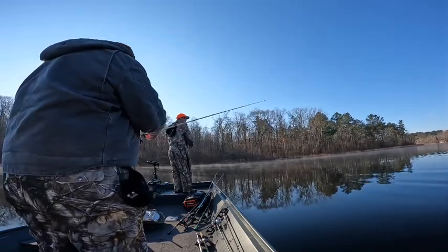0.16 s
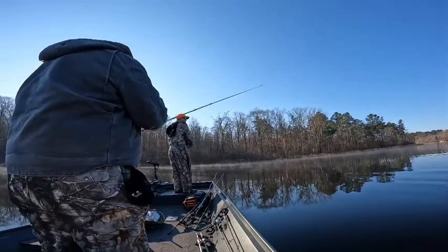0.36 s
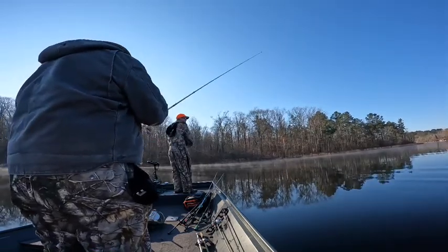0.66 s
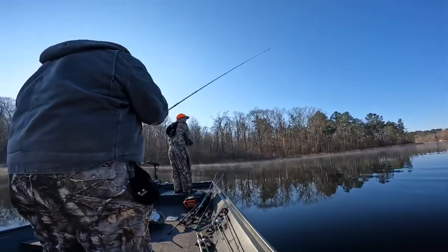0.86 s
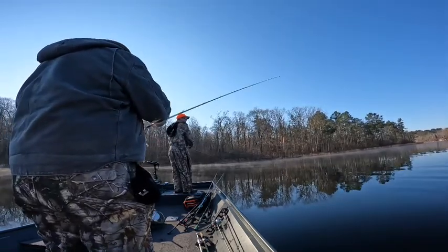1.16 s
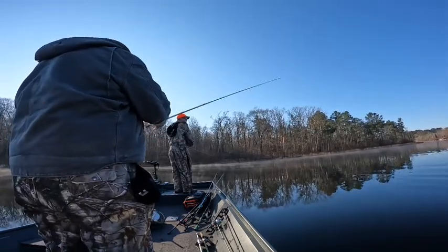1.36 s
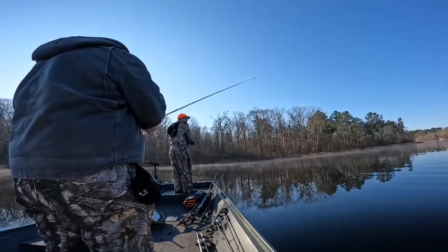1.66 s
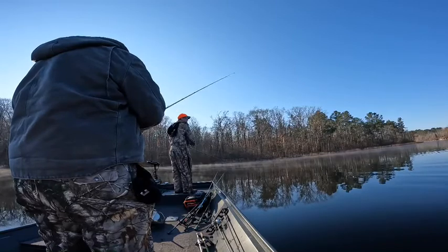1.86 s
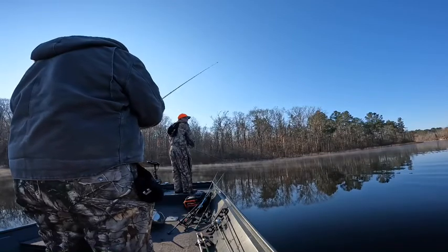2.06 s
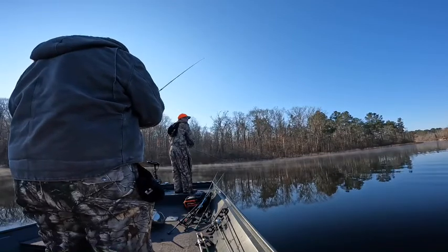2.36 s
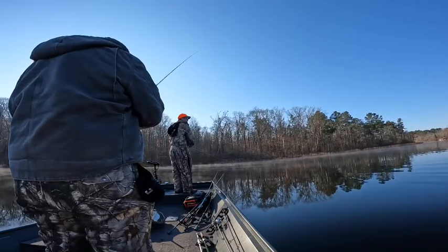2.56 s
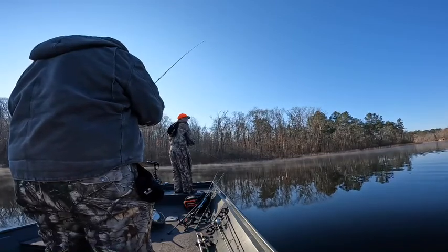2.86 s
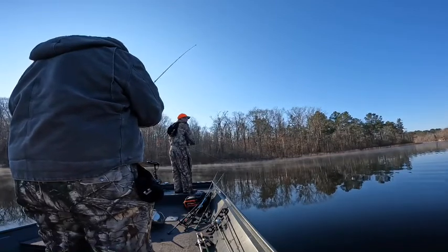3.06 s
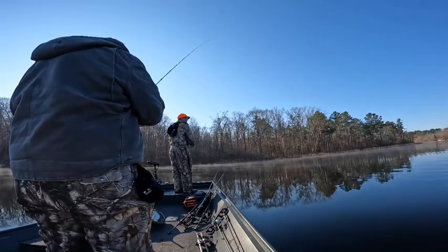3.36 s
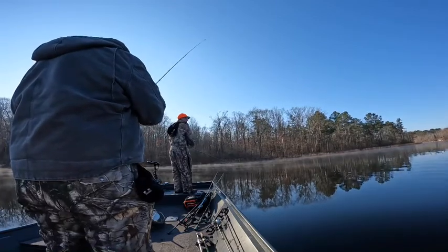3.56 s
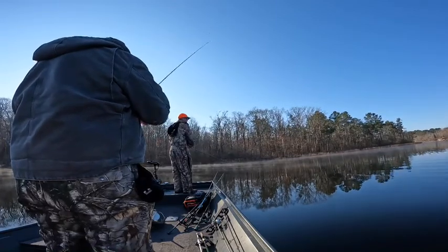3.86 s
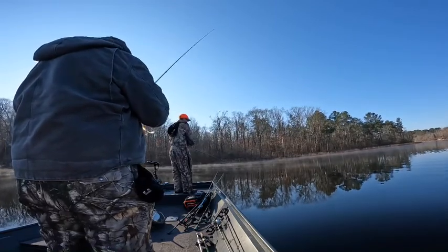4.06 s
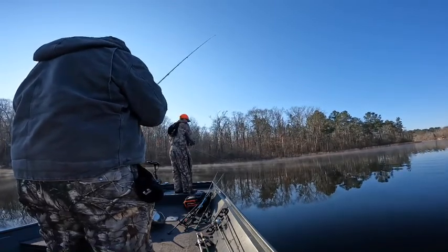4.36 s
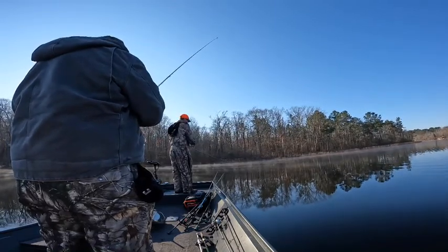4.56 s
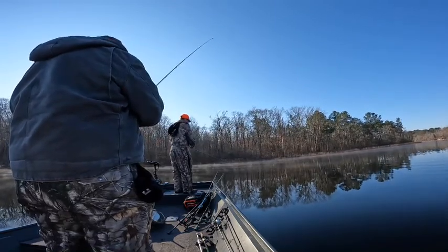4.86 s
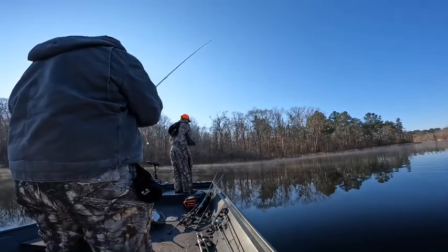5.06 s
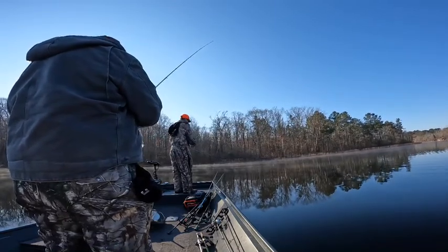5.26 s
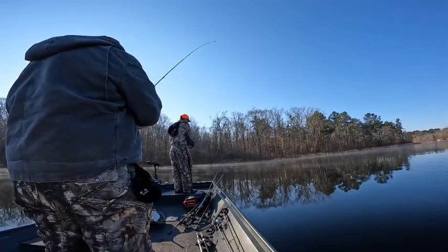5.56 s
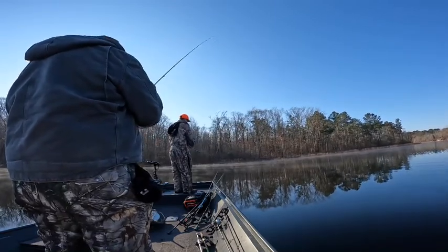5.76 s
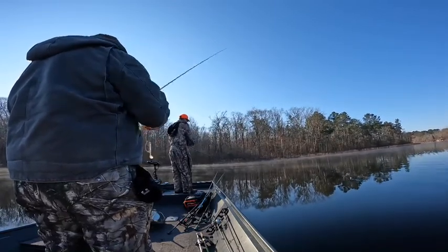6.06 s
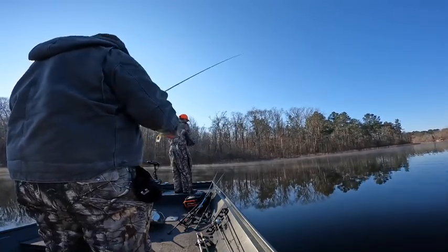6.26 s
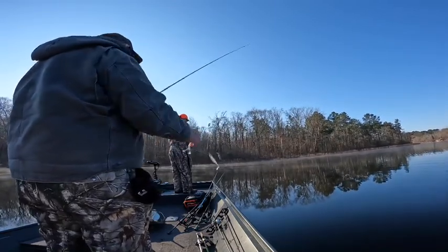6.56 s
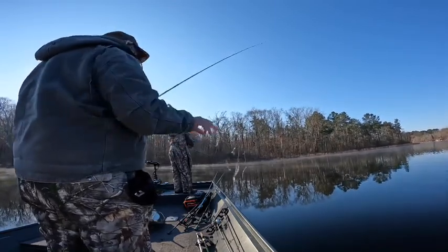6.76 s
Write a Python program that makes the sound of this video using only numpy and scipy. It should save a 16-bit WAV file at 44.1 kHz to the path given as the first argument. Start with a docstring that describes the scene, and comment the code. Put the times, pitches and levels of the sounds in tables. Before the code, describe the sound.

Close on a metal boat, gear knocks the hull at once, then strikes hardest around half a second with rattling rebounds. A sharp reel click follows, then sparse clicks, faint clinks and soft water plops. A stiff jacket rustles, and a lure jingles brightly near the end. A steady low motor rumble lies beneath quiet open river air.

```python
"""Gear knocks and rattles on the hull of an aluminium boat as an angler handles his tackle on a calm river.
Reel, rod and lure parts click, two spinner blades and a hook clink, beads tick and a stiff jacket rustles.
Behind them ripples plop on the hull, an electric motor rumbles and far birds call in quiet open air.
Struck parts are noise bursts with decaying modes; water, cloth, air and rumble are shaped noise, with bubbles
as rising sines; calls and squeaks are gliding tones."""
import sys
import numpy as np
from scipy import signal
from scipy.fft import rfft, irfft, next_fast_len
from scipy.io import wavfile
from scipy.ndimage import map_coordinates

SR = 44100
rng = np.random.default_rng(int(sys.argv[2]) if len(sys.argv) > 2 else 0)


def output_pcm(signal):
    """Save a mono or channel-first signal as 16-bit PCM at the path in sys.argv[1].

    Samples are clipped to [-1, 1] before scaling.
    """
    pcm = np.clip(np.atleast_2d(signal).T, -1, 1) * 32767
    wavfile.write(sys.argv[1], SR, np.round(pcm).astype(np.int16))


N = 305172
T = np.arange(SR // 2) / SR  # seconds within one hit
CLOCK = np.arange(N) / SR  # seconds within the scene
OPPOSED = np.array([[1], [-1]])  # left and right in opposite polarity
TOP_HZ = 15200


def amp(db):
    """Decibels to gain."""
    return 10 ** (np.asarray(db) / 20)


def unit(x):
    """Scale to rms 1."""
    return x / np.sqrt(np.mean(x ** 2) + 1e-20)


def curves(rows):
    """One value per sample for each column after the time."""
    s, *cols = np.transpose(rows)
    return [np.interp(CLOCK, s, c) for c in cols]


def random_curve(rate, times):
    """A smooth random curve with rate knots a second."""
    knots = rng.standard_normal(int(len(times) * rate / SR) + 4)
    return map_coordinates(knots, [times * rate])


def wobble(rate):
    """A smooth random curve over the whole scene."""
    return random_curve(rate, CLOCK)


def shimmer(rate):
    """A smooth random curve over one hit."""
    return random_curve(rate, T)


def noise(spectrum, size):
    """Noise of rms 1 shaped by a spectrum of (Hz, dB) points."""
    m = next_fast_len(size + 8192)
    hz, db = np.transpose(spectrum)
    log_hz = np.log(np.fft.rfftfreq(m, 1 / SR) + 1)
    gain = amp(np.interp(log_hz, np.log(hz), db))
    return unit(irfft(rfft(rng.standard_normal(m)) * gain, m)[:size])


def wide(spectrum, side_db, size):
    """Stereo noise: a shared part and an opposed part."""
    return noise(spectrum, size) + amp(side_db) * noise(spectrum, size) * OPPOSED


def fade(t60, attack):
    """The envelope of one hit: a quick onset, then a steady decay in dB."""
    return amp(-60 * T / max(t60, .003)) * (1 - np.exp(-T / attack))


def swell(s, spread):
    """A bell-shaped rise and fall around a time, 17 dB down one spread away."""
    return np.exp(-2 * ((CLOCK - s) / spread) ** 2)


def ring(modes, scatter_db, detune):
    """Damped modes, struck at new strengths and slightly new pitches each time."""
    hz, db, t60 = np.transpose(modes)[:, :, None]
    strength, shift = rng.standard_normal((2, len(modes), 1))
    level = amp(db + scatter_db * strength - 60 * T / t60)
    return np.sum(level * np.sin(2 * np.pi * hz * (1 + detune * shift) * T), axis=0)


def repeat(sound, delays, gains):
    """One hit's sound followed by delayed, rescaled copies."""
    copies = (gain * np.interp(T - delay, T, sound, left=0) for delay, gain in zip(delays, gains))
    return sound + sum(copies)


def uneven(start, length, count):
    """Times spread unevenly over a stretch."""
    return start + length * (np.arange(count) + rng.random(count)) / count


def add(track, s, sound):
    """Mix a sound into a track at a time."""
    start = max(round(s * SR), 0)
    track[:, start:start + len(T)] += sound[..., :N - start]


def pan(left_db):
    """Gains of the two channels, left_db apart."""
    return amp([[left_db / 2], [-left_db / 2]])


def aside(x, lag):
    """A source off to the right reaches the left microphone lag seconds later."""
    return np.array([np.interp(CLOCK - lag, CLOCK, x), x])


def near(x, hz):
    """Two close microphones hear the low notes of near things alike."""
    highpass = signal.butter(4, hz, "high", fs=SR, output="sos")
    side = signal.sosfiltfilt(highpass, (x[0] - x[1]) / 2)
    return x.mean(axis=0) + side * OPPOSED


def far(x):
    """Trees on the bank scatter a distant sound into a wavering tail."""
    bank_db, bank_t60_s = -6, 0.28
    tail = rng.standard_normal(len(T)) * fade(bank_t60_s, attack=.005)
    return x + amp(bank_db) * signal.fftconvolve(x, tail / np.linalg.norm(tail))[:N]


def glide(rows, partials_db, jitter, flutter_db):
    """A sliding tone with an unsteady pitch; each partial swells and fades on its own."""
    hz, db = curves(rows)
    phase = 2 * np.pi * np.cumsum(hz * (1 + jitter * wobble(150))) / SR
    sounding = (CLOCK > rows[0][0]) & (CLOCK < rows[-1][0])
    partials = (amp(level + flutter_db * wobble(35)) * np.sin(k * phase)
                for k, level in enumerate(partials_db, 1))
    return sounding * amp(db) * sum(partials)


def river():
    """Quiet open air is soft noise; far birds give one falling whistle and one nasal call with overtones."""
    # Colour of the air. Each row: frequency in Hz, relative density in dB per Hz.
    air_colour = [(240, -21.5), (400, -2), (602, -9), (921, -14), (1140, -13.5), (1910, -22.5), (4740, -30),
                  (9520, -40.5), (12100, -52.5), (15000, -54.5)]
    # The falling whistle. Each row: time in seconds, pitch in Hz, level in dB.
    whistle = [(1.87, 2860, -90), (1.915, 2750, -66), (1.98, 2665, -75), (2.05, 2437, -72.5),
               (2.14, 2370, -71.5), (2.195, 2330, -67.5), (2.235, 2180, -86)]
    # The nasal call. Each row: time in seconds, fundamental in Hz, level in dB before the partials' own.
    nasal = [(5.99, 925, -91), (6.03, 930, -68), (6.068, 946, -69), (6.1, 924, -67.5), (6.196, 899, -69),
             (6.25, 860, -75)]
    birds = glide(whistle, [0], jitter=0.009, flutter_db=1.5)
    birds = birds + glide(nasal, [-37, -2.5, 0.0, -2.5], jitter=0.012, flutter_db=3.5)
    return amp(-72.5) * wide(air_colour, side_db=-4.0, size=N) + aside(far(birds), lag=.00008)


def wavering_tone():
    """A faint low wavering tone, opposite in the two channels."""
    mean_hz, mean_db = 250, -66
    level = amp(mean_db + 3.1 * wobble(25))
    tone = level * np.sin(2 * np.pi * np.cumsum(mean_hz * (1 + .11 * wobble(14))) / SR)
    return tone * OPPOSED


def low_rumble():
    """The hull carries an electric motor's rumble and unsteady orders; the rumble's level changes briefly."""
    # Colour of the rumble. Each row: frequency in Hz, relative density in dB per Hz.
    rumble_colour = [(11, -40), (18, -5.5), (65, 2.5), (80, -0.5), (97, -10.5), (114, -1.5), (134, -7.5),
                     (160, -6), (170, -11), (183, -14), (238, -15.5), (324, -27), (410, -31.5),
                     (447, -39.5), (600, -56), (780, -75.5), (1320, -120)]
    # Motor orders. Each row: frequency in Hz, mean level in dB.
    orders = [(37.7, -52), (77, -53), (118.5, -56), (156.5, -54)]
    # Brief uneven rises and one dip of the low rumble, the first a fading knock.
    # Each row: middle in seconds, change of level in dB.
    level_changes = [(0.019, 13), (0.601, 2), (1.58, 3), (2.07, 7), (3.2, 6.5), (3.901, -1), (5.72, 5),
                     (6.148, 7), (6.891, 8)]
    rumble_db, drift_db, change_spread_s = -44.5, 0.5, 0.017
    changes_db = sum(db * swell(s, change_spread_s) for s, db in level_changes)
    level_db = rumble_db + drift_db * wobble(10) + changes_db
    hum = sum(amp(db + 1.3 * wobble(5.3)) * np.sin(2 * np.pi * hz * CLOCK + 0.72 * wobble(5.5))
              for hz, db in orders)
    return amp(level_db) * wide(rumble_colour, side_db=-26.5, size=N) + hum


def laps():
    """A ripple slaps under the hull's edge with a splash and traps three plopping bubbles; the wash dies away."""
    # Slaps. Each row: start in seconds, plop level in dB, its base pitch in Hz, splash level in dB.
    slaps = [(.378, -58, 1100, -72), (.395, -60, 1100, -71.5), (1.87, -62, 1090, -67),
             (1.902, -55, 1110, -67), (2.069, -55, 1010, -64), (2.086, -56, 1014, -63),
             (2.431, -65, 1092, -76.5), (2.804, -59.5, 1076, -73), (3.409, -53.5, 1112, -60),
             (3.444, -58, 1156, -71.5), (3.628, -53, 1070, -56.5), (3.644, -51, 1030, -59),
             (3.672, -66, 1050, -68), (4.108, -53, 1065, -63), (4.138, -56, 1100, -72),
             (4.371, -54, 987, -61.5), (4.383, -55.5, 1080, -63), (4.401, -57, 1030, -68.5),
             (4.854, -58, 1300, -59.5), (4.865, -58.5, 1153, -67), (4.894, -57, 1096, -78),
             (5.087, -59, 1070, -64), (5.105, -55, 1050, -65), (5.206, -60, 1250, -63),
             (5.585, -55, 1170, -69.5), (5.612, -57.5, 1180, -72), (5.807, -60, 1140, -75),
             (5.827, -58, 1080, -78), (6.297, -51, 1110, -69), (6.553, -55, 997, -64),
             (6.573, -56, 1020, -63)]
    # Colour of the splash. Each row: frequency in Hz, relative density in dB per Hz.
    splash_colour = [(500, -20), (1100, 1), (2100, -4.5), (2700, -11), (3200, -6.5), (4000, -18.5),
                     (8000, -25.5), (15000, -73)]
    # Colour of the wash. Each row: frequency in Hz, relative density in dB per Hz.
    wash_colour = [(500, -24), (850, -9), (1050, 0), (1350, -3.5), (1800, -13.5), (4000, -26), (15000, -68)]
    wash_db = -10  # against the plop
    bubble_step = .25  # each smaller bubble is higher by this share of the base pitch
    channel_phase = np.array([[0], [.8]])  # radians: the plop comes from one side
    out = np.zeros((2, N))
    for s, db, hz, splash_db in slaps:
        splash_shape = fade(0.03, attack=0.00025) + amp(-16) * fade(.2, attack=.006)
        splash = wide(splash_colour, side_db=-2, size=len(T)) * splash_shape
        wash = wide(wash_colour, side_db=-2.5, size=len(T)) * fade(0.15, attack=0.0046)
        add(out, s, amp(splash_db) * splash + amp(db + wash_db) * wash)
        for k, (pitch, lag) in enumerate(rng.standard_normal((3, 2))):
            bubble_hz = hz * (1 + bubble_step * k) * np.exp(.03 * pitch)
            phase = 2 * np.pi * bubble_hz * T * (1 + T) + channel_phase  # the pitch rises
            bubble = amp(db - 10.2 * k) * np.sin(phase) * fade(0.044, attack=0.00048)
            add(out, s + k * 0.0022 * np.exp(0.64 * lag), bubble)
    return out


def jacket():
    """Stiff cloth rubs in small uneven catches with each arm movement; firmer brushes sound duller."""
    # Sleeve brushes. Each row: middle in seconds, spread in seconds, level in dB, firmness from 0 to 1.
    strokes = [(.01, 0.19, -63, 0.4), (0.264, 0.053, -66.5, 0.03), (0.506, 0.75, -73.5, 0.32),
               (0.697, 0.028, -60.5, 0.45), (1.183, 0.11, -66.5, 0.67), (1.442, 0.31, -69.5, 0.33),
               (1.998, 0.51, -81, 0.22), (2.738, 0.14, -79.5, 0.05), (3.521, 0.095, -78.5, 0.2),
               (4.277, 0.1, -66, 0.31), (4.465, 0.11, -68.5, 0.34), (5.02, 0.12, -67.5, 0.63),
               (5.988, 0.033, -57.5, 0.83), (6.18, 0.27, -62.5, 0.32), (6.444, 0.71, -72.5, 0.24),
               (6.87, 0.25, -57.5, 0.34)]
    # Colour of light rubbing. Each row: frequency in Hz, relative density in dB per Hz.
    light_colour = [(400, -11.5), (1200, 6.5), (2500, -4), (5000, -1), (7500, 1), (9000, -11.5),
                    (12500, -10), (15000, -27)]
    # Colour of firm brushing. Each row: frequency in Hz, relative density in dB per Hz.
    firm_colour = [(600, -22.5), (1200, -3.5), (2100, 2), (2900, -1.5), (4000, -14), (7000, -11),
                   (14000, -35.5)]
    light, firm = amp(-85), 0  # a faint rustle stays between arm movements
    for s, spread, db, firmness in strokes:
        stroke = amp(db) * swell(s, spread)
        light = np.hypot(light, (1 - firmness) * stroke)
        firm = np.hypot(firm, firmness * stroke)
    catches = unit(amp(1.2 * wobble(40) + 0.88 * wobble(400)))
    light_rub = light * wide(light_colour, side_db=-11.0, size=N)
    firm_rub = firm * wide(firm_colour, side_db=-10.0, size=N)
    return catches * (light_rub + firm_rub)


def squeaks():
    """Ribs of the sleeve's stiff cloth slide over each other: short rough tones that glide in pitch."""
    # Squeaks. Each row: start in seconds, length in seconds, first pitch in Hz, last pitch in Hz, level in dB.
    chirps = [(1.106, 0.069, 930, 1510, -69), (1.122, 0.051, 1970, 2100, -70),
              (1.19, 0.066, 2480, 2330, -71), (4.949, 0.084, 1670, 1750, -67.5),
              (4.965, 0.051, 2600, 2580, -66), (5.027, 0.04, 2140, 2050, -66.5)]
    out = np.zeros((2, N))
    for s, length, first_hz, last_hz, db in chirps:
        progress = np.clip(T / length, 0, 1)
        hz = first_hz + (last_hz - first_hz) * progress
        phase = 2 * np.pi * np.cumsum(hz) / SR + .6 * shimmer(350)
        add(out, s, amp(db + 2.5 * shimmer(86)) * np.sin(np.pi * progress) * np.sin(phase))
    return out


def line():
    """Fishing line squeaks in a rod guide: one brief gliding tone."""
    # The squeak. Each row: time in seconds, pitch in Hz, level in dB.
    squeak = [(.164, 6500, -78), (.172, 7200, -63.5), (.186, 7700, -63), (.2, 7750, -80), (.23, 7800, -82)]
    return glide(squeak, [0], jitter=0.0096, flutter_db=4)


def beads():
    """Many small beads on the lure's wire tick against each other as it swings: a fine metallic rustle."""
    # Bead rattles. Each row: start in seconds, length in seconds, typical level of a tick in dB.
    rattles = [(6.13, .11, -74), (6.691, .22, -62)]
    bead_hz, bead_t60_s = 5430, 0.016  # the pitch scatters around this value
    out = np.zeros((2, N))
    for start, length, db in rattles:
        for s, (pitch, strength) in zip(uneven(start, length, count=48), rng.standard_normal((48, 2))):
            tone = np.sin(2 * np.pi * bead_hz * np.exp(.17 * pitch) * T)
            tick = tone * fade(bead_t60_s, attack=.0002)
            add(out, s, amp(db + 2 * strength) * tick * pan(1.9))
    return out


def pings(taps, modes):
    """A metal part of the lure rings cleanly with each tap."""
    out = np.zeros((2, N))
    for s, db in taps:
        onset = 1 - np.exp(-T / .0004)
        add(out, s, amp(db) * ring(modes, scatter_db=1, detune=.001) * onset * pan(2))
    return out


def hook():
    """The steel hook is tapped and rings in a few high modes."""
    # Taps on the hook. Each row: start in seconds, level in dB.
    hook_taps = [(3.348, -58.5), (3.875, -62), (3.906, -61.5), (4.161, -73), (5.707, -65.5), (6.013, -62)]
    # Modes of the hook. Each row: frequency in Hz, relative level in dB, 60 dB decay in seconds.
    hook_modes = [(2164, -7, .08), (5986, 0, .16), (7052, -13, .1), (14700, -23, .15)]
    return pings(hook_taps, hook_modes)


def rim():
    """A blow on the larger blade's rim wakes its low modes."""
    # Blows on the rim. Each row: start in seconds, level in dB.
    rim_taps = [(6.049, -60.5), (6.28, -40.5), (6.297, -44.5)]
    # Low modes of the larger blade. Each row: frequency in Hz, relative level in dB, 60 dB decay in seconds.
    rim_modes = [(2690, -22, 0.13), (3200, -15.5, 0.16), (5770, -5.5, 0.074), (5794, -1.5, 0.1),
                 (6720, -6, 0.1)]
    return pings(rim_taps, rim_modes)


def jingle(start, length, db, count):
    """Light touches at uneven times while the lure swings, mostly on the small blade."""
    damping_t60_s = 1  # the blades lie against each other
    times = uneven(start, length, count)
    scatter = rng.standard_normal((count, 3))
    return [(s, db + 2.0 * a, 10100 * (1 + 0.0143 * b), db - 15 + 3 * c, damping_t60_s)
            for s, (a, b, c) in zip(times, scatter)]


def clinks():
    """Two thin blades ring with each touch and flutter on their wire; a harder touch ticks louder."""
    # Blade touches. Each row: start in seconds, small blade level in dB, its pitch in Hz, large blade level in dB,
    # 60 dB decay of the damping by contact in seconds.
    touches = [(.846, -53.5, 9530, -87, 0.19), (1.03, -67, 10100, -91, 0.27),
               (1.089, -60, 10120, -76.5, 0.18), (1.571, -70, 9800, -90, 0.83),
               (1.649, -70, 9970, -92, 0.25), (1.748, -54.5, 10020, -95, 0.19),
               (3.338, -70, 10300, -85, 1.1), (3.399, -68, 10270, -78, .8), (3.875, -60, 10260, -88, 1),
               (3.905, -52, 10280, -86, 1.8), (3.945, -60, 10320, -92, 0.47), (4.159, -66.5, 10270, -89, 1),
               (4.171, -56.5, 10270, -85, 1.6), (4.456, -61, 9900, -97, 0.42), (4.927, -85, 9980, -97, .6),
               (5.707, -71, 10000, -72, 1.05), (6.051, -63, 10100, -61, 1.2), (6.17, -54, 9700, -73.5, .3),
               (6.224, -56, 10200, -59, 0.89), (6.276, -47, 9900, -39.5, 0.45),
               (6.281, -45, 10280, -50, .09), (6.297, -54, 10070, -38, 0.2), (6.318, -52, 10150, -49, 2.7),
               (6.67, -61, 10050, -68, 0.23), (6.694, -45, 10250, -66, 0.22),
               (6.706, -39, 10300, -70, 0.13), (6.725, -37, 10260, -66, 0.2),
               (6.774, -40.5, 10250, -72, 0.098), (6.811, -50, 10000, -48, 0.29),
               (6.83, -65, 10070, -41, 0.24), (6.844, -66, 10070, -48, .3)]
    # Light jingling as the lure swings. Each row: start in seconds, length in seconds, small blade level in dB.
    jingles = [(1.145, .9, -69), (6.128, .08, -56), (6.458, .12, -68), (6.84, .08, -61)]
    # Modes of the small blade, transposed at each touch. Each row: free frequency in Hz, relative level in dB,
    # 60 dB decay in seconds.
    small_modes = [(5545, -18, .12), (9720, -14, .08), (10070, -9, .16), (10270, 1.5, .19),
                   (13720, -15, .17), (14230, -23, .1), (14700, -22, .12)]
    # Modes of the large blade. Each row: frequency in Hz, relative level in dB, 60 dB decay in seconds.
    large_modes = [(5545, -22, .17), (5803, -22, .08), (9851, -13, .1), (11135, 0, .15), (11177, -7, .17),
                   (11440, -19, .1), (12865, -7, .15), (14090, -22, .1)]
    scrape_colour = [(2000, -21.0), (6000, -2.5), (10000, 2), (11300, -1), (12500, -4.5), (15000, -17)]
    tick_at_50_db, tick_grows = -54, 0.82  # tick in dB when the blades ring at -50 dB; dB per dB of ring
    out = np.zeros((2, N))
    free_hz = max(small_modes, key=lambda mode: mode[1])[0]  # the strongest mode sets the pitch
    light = [touch for row in jingles for touch in jingle(*row, count=4)]
    for s, small_db, small_hz, large_db, t60 in list(touches) + light:
        modes = [(hz * small_hz / free_hz, db, mode_t60) for hz, db, mode_t60 in small_modes]
        small = amp(small_db) * ring(modes, scatter_db=0.5, detune=0.0035)
        large = amp(large_db) * ring(large_modes, scatter_db=2, detune=0.0016)
        flutter = unit(amp(3 * shimmer(160))) * fade(t60, attack=.0015)
        scrape = wide(scrape_colour, side_db=-16.0, size=len(T))
        tick_db = tick_at_50_db + tick_grows * (max(small_db, large_db) + 50)
        tick = amp(tick_db) * fade(0.027, attack=0.003) * scrape
        add(out, s, flutter * (small * pan(4.1) + large * pan(5.4)) + tick * pan(2.1))
    return out


def clicks():
    """Small parts of the reel, rod and lure snap and settle with a buzzing ring; the boat's sides return a tail."""
    # Clicks. Each row: start in seconds, overall level in dB, pitch of the struck part in Hz, its ring in dB,
    # 60 dB decay in seconds, ring of the reel's frame in dB, second tick in dB; the last levels are relative.
    snaps = [(.152, -57, 2880, -7, 0.051, -40, -17), (.234, -56, 4840, -7, 0.084, -30, -16),
             (1.0248, -52, 6860, 0.5, 0.014, -40, -11), (1.5704, -34.5, 5504, -8, 0.02, -12, -19),
             (1.574, -37, 3500, -2, 0.024, -1, -18.5), (1.75, -55, 6040, -12, .03, -20, -14),
             (1.757, -49, 2020, -6.5, 0.04, -3.5, -11), (2.101, -53, 8200, -14, 0.045, -21, -10),
             (3.332, -55.5, 2330, -11, 0.066, -18, -6), (3.351, -49, 5920, -33, 0.074, -19, -11),
             (3.479, -54, 6200, -25, 0.065, -16, -5), (3.87, -45, 3370, -13, 0.068, -11, -6),
             (3.9058, -53, 3340, -10, 0.052, -12, -7), (3.946, -56, 2005, -8, 0.033, -30, -10),
             (4.16, -48, 2520, -11.5, 0.073, -19, -11), (4.294, -45.5, 6420, -3.5, 0.028, -40, -5),
             (4.428, -54, 6460, -10, 0.054, -40, -9), (5.594, -56.5, 3050, -3, 0.052, -28, -14),
             (5.608, -55.5, 3230, 4.5, 0.048, -16, -1), (5.625, -51.5, 3120, -2.5, 0.14, -14, -10),
             (5.707, -49, 3080, 3, 0.036, -14, -23), (5.708, -48, 6320, 0, 0.031, -24, -8),
             (5.72, -51.5, 3090, 4, 0.034, -18, -22), (6.047, -47.5, 5870, -15, 0.04, -29, -18),
             (6.141, -48, 5560, -13, 0.091, -40, -7), (6.174, -65.5, 5560, 7, 0.12, -40, -3),
             (6.213, -51, 6240, -7, 0.068, -30, -3), (6.279, -38, 3190, -28, 0.04, -23, -7),
             (6.298, -52, 2580, 0.5, 0.077, -40, -18), (6.67, -55, 6650, -5, 0.038, -41, -6),
             (6.705, -44, 6600, -7, 0.019, -25, -10), (6.716, -62, 5450, 3, .07, -30, -7),
             (6.727, -60, 6850, 3, .04, -30, -14), (6.773, -50, 5500, -5, .03, -25, -10),
             (6.809, -49, 5810, 2.5, 0.022, -23, -16), (6.83, -45, 4800, -9, .03, -14, -12),
             (6.883, -55.5, 2620, 2, 0.033, -25, -12)]
    # Colour of the snap. Each row: frequency in Hz, relative density in dB per Hz.
    snap_colour = [(700, -41), (1300, -2), (1800, 1.5), (2400, -1.5), (3300, -2), (4300, -1), (5500, 3.5),
                   (7000, 2.5), (8500, -3), (12000, -15), (15000, -37.5)]
    # Modes of the reel's metal frame. Each row: frequency in Hz, relative level in dB, 60 dB decay in seconds.
    frame_modes = [(1782, -17, 0.047), (2180, -9, 0.028), (3120, -11, .025), (3410, -3.5, .048),
                   (3720, -4, 0.032), (3880, -1, 0.04), (4120, -0.5, 0.036), (4344, -3, 0.038),
                   (4580, -6, .035), (4950, -4, .025), (5470, -3, 0.036), (6060, -10, .025),
                   (8600, -17, 0.029), (9040, -21, 0.055)]
    settle_s = 0.0137  # from the snap to the second tick
    out = np.zeros((2, N))
    for s, db, hz, ring_db, t60, frame_db, settle_db in snaps:
        settle = [settle_s], [amp(settle_db)]
        shape = repeat(fade(t60, attack=0.0002), *settle)
        tail = amp(-17) * fade(0.22, attack=0.015)
        snap = amp(-10.0) * wide(snap_colour, side_db=-10.5, size=len(T)) * (shape + tail)
        phase = 2 * np.pi * hz * T + 1.2 * shimmer(900)
        part = amp(ring_db + 0.5) * np.sin(phase) * shape
        buzz = unit(amp(4 * shimmer(800)))
        frame_ring = ring(frame_modes, scatter_db=4.5, detune=0.0041) * (1 - np.exp(-T / 0.0015))
        frame = amp(frame_db) * buzz * repeat(frame_ring, *settle)
        add(out, s, amp(db) * (snap + part + frame))
    return out * pan(0.97)


def rebounds(length, count):
    """Uneven delays and gains of the contacts of a rattle, which die out steeply past its length."""
    step_s, rebound_db = .0062, -6.5  # mean time between contacts; their strength against the blow
    early, strength = rng.standard_normal((2, count))
    delays = step_s * (np.arange(count) + 1 + .2 * early)
    return delays, amp(rebound_db + 1.4 * strength) / (1 + (delays / length) ** 8)


def knocks():
    """Each blow cracks, dents a panel for a few cycles and rings the hull; loose gear rattles after it."""
    # Gear striking the hull. Each row: start in seconds, crack level in dB, thump level in dB, thump pitch in Hz,
    # length of the rattle in seconds, how freely the metal rings in dB.
    blows = [(.001, -23, -26.5, 536, 0.0067, -10), (.006, -21.5, -24, 524, .013, -5),
             (.03, -31.5, -24.5, 80, 0.007, -4.5), (.268, -40.5, -39.5, 298, 0.0115, -1.5),
             (0.349, -48.5, -55.5, 244, 0.024, -1.5), (.498, -30.5, -19.5, 204, .0055, -3.5),
             (.506, -23, -22, 121, .02, -2), (.527, -32.5, -37.5, 430, .006, -2.5),
             (0.54, -26.5, -37.5, 406, 0.014, -0.5), (0.5651, -15, -22.5, 358, .0035, 3),
             (.567, -14, -14.5, 198, 0.0033, 1), (.571, -25.5, -25, 115, .0045, 0.5),
             (.577, -19.5, -21, 340, 0.016, -0.5), (0.6011, -20.5, -33, 465, 0.004, -2),
             (.617, -36, -30, 493, .004, -5.5), (.643, -32, -40.5, 397, 0.0034, 1),
             (.652, -50, -35.5, 470, .004, -4), (.725, -47, -38, 215, 0.0053, -0.5),
             (1.276, -43.5, -45.5, 314, 0.0094, -6), (1.286, -28, -32.5, 297, 0.0061, -5),
             (1.294, -41.5, -36, 375, 0.0046, -7), (1.336, -50, -44, 455, .005, 2)]
    # Low panel modes of the hull. Each row: frequency in Hz, relative level in dB, 60 dB decay in seconds.
    panel_modes = [(101, -21.5, 0.1), (127, -10.5, 0.075), (150.7, -3, 0.5), (196, -5, 0.082),
                   (238, -0.5, 0.26), (274, -4, 0.11), (345.1, -13, 0.27), (359, -4, 0.15),
                   (438, -0.5, 0.18), (466, -13, 0.22), (497, -10.5, 0.22), (530, -11, 0.13)]
    # Higher ring of its sheet metal. Each row: frequency in Hz, relative level in dB, 60 dB decay in seconds.
    plate_modes = [(642, -15, .14), (711, -15, .17), (989, 0, .07), (1082, -4, .075), (1170, -9, .07),
                   (1253, -9, .07), (1351, -7, .07), (1381, 0, .08), (1497, -1, .07), (1590, -9, .04),
                   (1814, -12, .07), (1911, -11, .06), (2207, -12, .08), (2329, -6, .08), (2520, -9, .06),
                   (2600, -8, .05), (2692, -9, .07)]
    # Colour of the crack. Each row: frequency in Hz, relative density in dB per Hz.
    crack_colour = [(250, -1), (480, -5.5), (600, -8.5), (850, -8), (1000, 4.5), (1500, -12.5),
                    (2000, -10.5), (3000, -13.5), (4500, -12), (7000, -20), (9000, -30.5), (13000, -41.5),
                    (15000, -68)]
    # Colour of the hull's dense low ring. Each row: frequency in Hz, relative density in dB per Hz.
    boom_colour = [(90, -25), (150, -2.5), (260, -0.5), (480, -2), (560, -10), (750, -20), (1200, -51.5)]
    plate_db = -19.5  # against the crack, before the blow's own ring level
    panel_db = -17  # against the thump, before the blow's own ring level
    boom_db, boom_t60_s = -16, .25  # level against the thump
    # the crack: a sharp burst, a short body and a faint tail
    crack_shape = (amp(-9.5) * fade(0.0017, attack=0.00093) + amp(-7.5) * fade(0.052, attack=0.00085)
                   + amp(-33) * fade(0.22, attack=0.0044))
    out = np.zeros((2, N))
    for s, db, thump_db, thump_hz, rattle_s, ring_db in blows:
        delays, gains = rebounds(rattle_s, count=11)
        chatter = unit(amp(3.0 * shimmer(700)))  # the contact is many tiny touches
        envelope = np.sqrt(repeat(crack_shape ** 2, delays, gains ** 2))  # noise bursts add in power
        crack = wide(crack_colour, side_db=-14.5, size=len(T)) * chatter * envelope
        plate_ring = ring(plate_modes, scatter_db=2.5, detune=.002)
        plate = amp(plate_db + ring_db) * repeat(plate_ring, delays, gains)
        panel_ring = ring(panel_modes, scatter_db=3.0, detune=0.022) * (1 - np.exp(-T / 0.0018))
        panels = amp(panel_db + ring_db) * panel_ring
        boom_noise = wide(boom_colour, side_db=-10.5, size=len(T))
        boom = amp(boom_db) * boom_noise * fade(boom_t60_s, attack=.003)
        thump = np.sin(2 * np.pi * thump_hz * T) * fade(.06, attack=0.0013)
        bright = amp(db) * (crack + plate) * pan(1.3)
        low = amp(thump_db) * ((panels + boom) * pan(1.3) - thump)
        add(out, s, bright + low)
    return out


def scene():
    """Everything in and around the boat."""
    tackle = knocks() + clicks() + clinks() + beads() + hook() + rim() + line()
    handling = near(tackle + jacket() + squeaks(), hz=520)
    return handling + laps() + low_rumble() + wavering_tone() + river()


def record(dry):
    """A steep band limit removes everything from the top frequency upward."""
    m = next_fast_len(N + SR // 2)
    kept = np.fft.rfftfreq(m, 1 / SR) < TOP_HZ
    return irfft(rfft(dry, m) * kept, m)[:, :N]


dry = scene()
out = record(dry)
output_pcm(out)
```